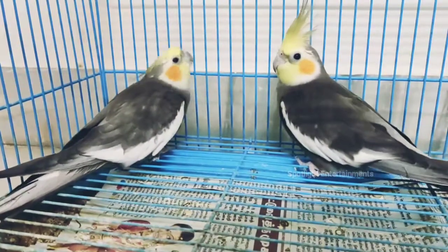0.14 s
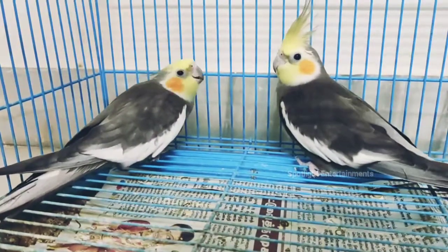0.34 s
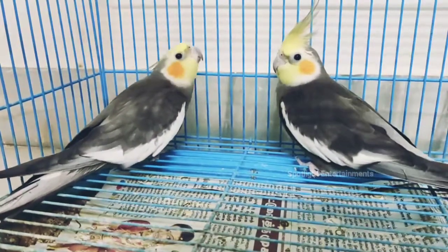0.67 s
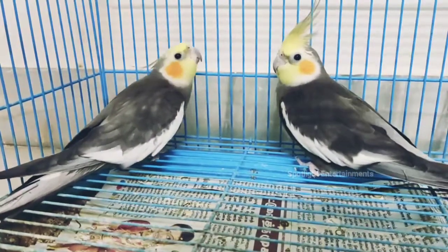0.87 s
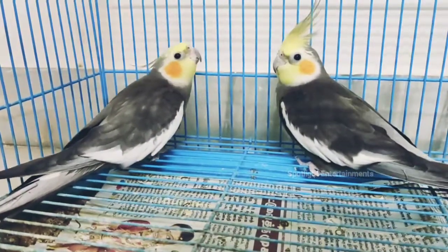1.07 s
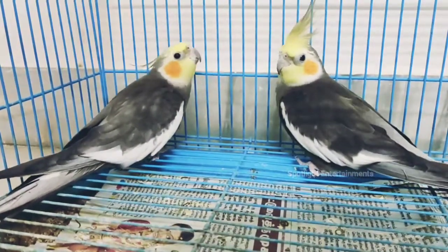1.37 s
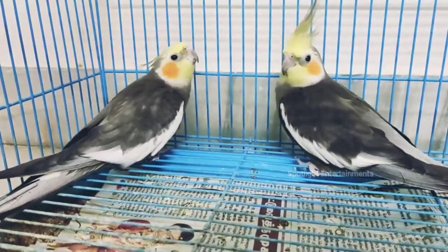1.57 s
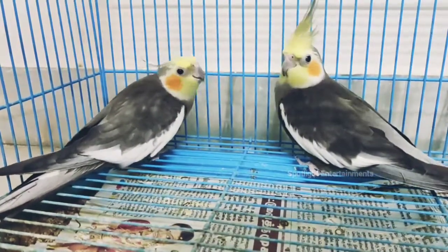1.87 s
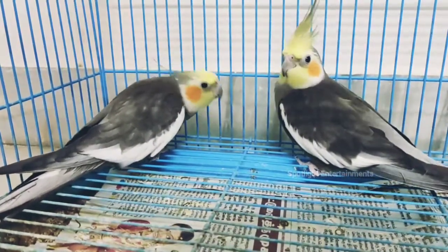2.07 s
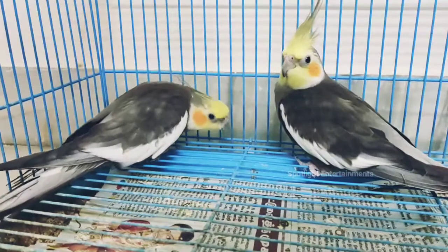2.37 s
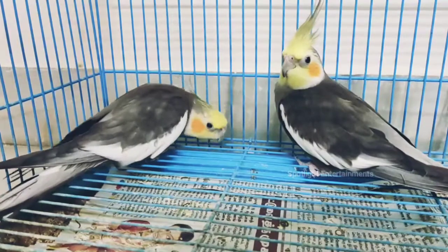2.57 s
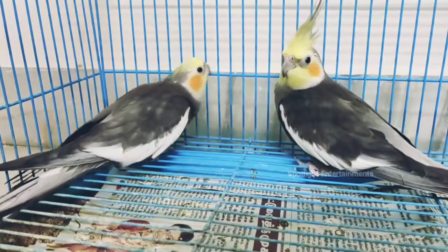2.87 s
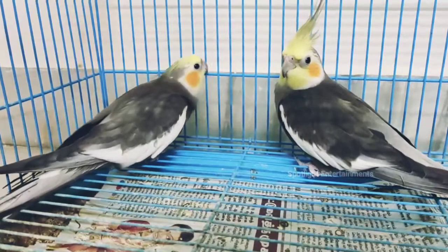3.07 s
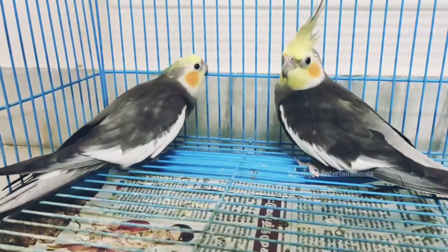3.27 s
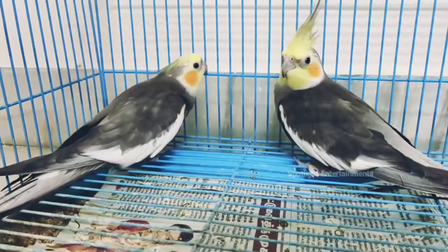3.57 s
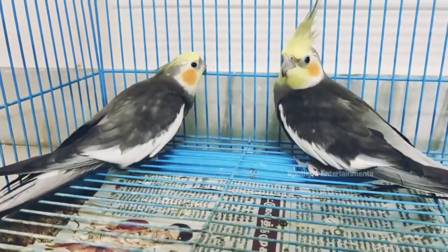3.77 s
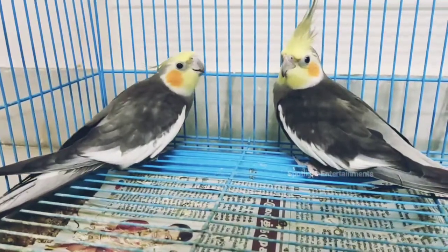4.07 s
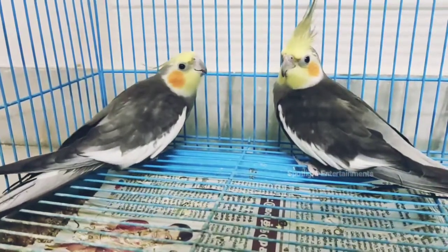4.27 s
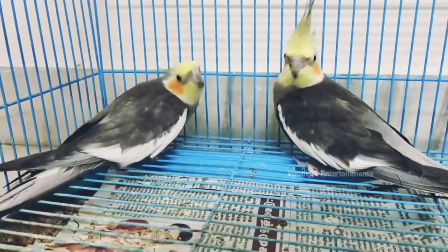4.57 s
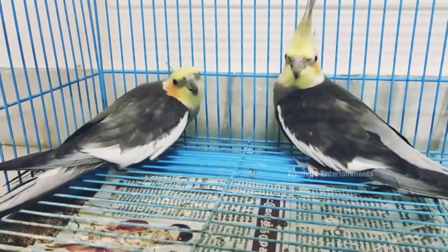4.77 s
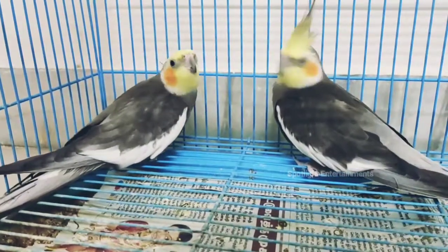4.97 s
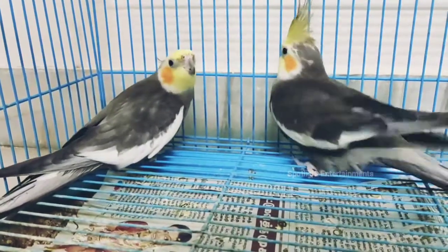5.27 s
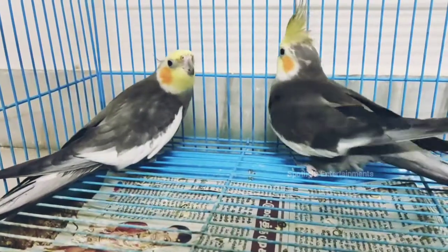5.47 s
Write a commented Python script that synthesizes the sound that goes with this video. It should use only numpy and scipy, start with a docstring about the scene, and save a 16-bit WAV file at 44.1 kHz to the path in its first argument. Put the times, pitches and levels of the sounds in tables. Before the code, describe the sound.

A cockatiel calls close to the microphone in a small, hard-walled room. It opens with short buzzy notes and two loud squawks. After a pause comes a run of tiny pips and hoarse, sliding chirps ending in one squawk. Another pause follows, then a few more pips and buzzes and two final squawks. Each call rings briefly over a faint, low rush of air.

```python
"""A small hard-walled room, with two cockatiels in a wire cage close by.
One calls in three quick runs: short pips, low buzzes and hoarse rasps lead up to loud arched squawks.
Each note is a buzzing tone from the syrinx, the bird's voice box, mixed with the hiss of its breath.
The room rings on over a low, steady rush of air."""
import sys
import numpy as np
from scipy import signal
from scipy.fft import rfft, irfft
from scipy.io import wavfile
from scipy.ndimage import uniform_filter1d

SR = 44100
rng = np.random.default_rng(int(sys.argv[2]) if len(sys.argv) > 2 else 0)


def persist_wave(psi):
    """Save psi, clipped to +-1, as 16-bit WAV."""
    counts = np.round(np.clip(psi, -1, 1) * 32767).astype(np.int16)
    wavfile.write(sys.argv[1], SR, np.atleast_2d(counts).T)


N = 248283
TIME = np.arange(N) / SR
PROGRESS = np.linspace(0, 1, 200)   # from the start of a note to its end


def from_db(db):
    """Turn decibels into a volume multiplier."""
    return 10 ** (np.asarray(db) / 20)


def rms_one(x):
    """Scale a signal to an average power of 1."""
    return x / np.sqrt(np.mean(x ** 2) + 1e-20)


def at_hz(points, hz):
    """Read between a table's rows, giving each octave equal space."""
    known_hz, values = np.transpose(points)
    return np.interp(np.log(np.maximum(hz, 1)), np.log(known_hz), values)


def coloured(x, spectrum):
    """Turn each frequency up or down as a table says."""
    size = x.shape[-1]
    return irfft(rfft(x) * from_db(at_hz(spectrum, np.fft.rfftfreq(size, 1 / SR))), size)


def flutter(rate_hz, size):
    """A random wobble of about 1 either way, mostly slower than rate_hz."""
    lowpass = signal.butter(2, rate_hz, fs=SR, output="sos")
    return rms_one(signal.sosfilt(lowpass, rng.standard_normal(size + SR // 10)))[-size:]


# tone colour of the room's air: (frequency [Hz], relative level [dB])
AIR_COLOUR = [(15, -44.5), (25, -7), (48, -4), (86, -7.5), (113, 2), (137, -7.5), (184, -0.5), (299, -7),
              (333, -13.5), (437, -11), (1060, -18), (1590, -25.5), (2030, -25), (6660, -42),
              (15800, -35.5)]
# how loud the air is: (time [s], level [dB])
AIR_LOUDNESS = [(0, -48.5), (.7, -50), (1.2, -54.5), (2.2, -49), (2.8, -48), (3.6, -54.5), (4.2, -53),
                (4.8, -48.5), (5.6, -54.5)]
# how alike it sounds left and right: (frequency [Hz], likeness [0-1])
AIR_SAMENESS = [(60, 0.85), (150, 1), (380, 0.76), (950, 0.81), (2380, 0.17), (5980, 0), (15000, 0.036)]

def air():
    """A low rush of air, nearly the same on both sides in the bass."""
    hz = np.fft.rfftfreq(N, 1 / SR)
    alike = np.clip(at_hz(AIR_SAMENESS, hz), 0, .99)
    shared, opposed = rfft(rng.standard_normal((2, N)))
    sides = np.sqrt(1 + alike) * shared + np.sqrt(1 - alike) * opposed * [[1], [-1]]
    rush = rms_one(irfft(sides * from_db(at_hz(AIR_COLOUR, hz)), N))
    return from_db(np.interp(TIME, *np.transpose(AIR_LOUDNESS))) * rush


# rise and fall of a faint high ring: (time [s], level [dB])
HAZE_LOUDNESS = [(.6, -91), (.72, -56), (.85, -63), (1.05, -79), (1.3, -85)]
# its tone colour: (frequency [Hz], relative level [dB])
HAZE_COLOUR = [(1500, -28.5), (2600, -4.5), (3600, 2.5), (5000, -5), (6200, -21), (12000, -32)]

def haze():
    """A faint, high ringing around 3-4 kHz, heard all around, that dies away after the first run of calls."""
    level = from_db(np.interp(TIME, *np.transpose(HAZE_LOUDNESS)))
    return level * rms_one(coloured(rng.standard_normal((2, N)), HAZE_COLOUR))


# how long the room rings: (frequency [Hz], time to fade by 60 dB [s])
RING_TIME = [(500, 0.5), (1500, 0.1857), (2800, 0.3232), (4200, 0.22), (6500, 0.3644), (15000, 0.3)]
# how strongly it rings: (frequency [Hz], level [dB])
RING_COLOUR = [(500, -2.5), (1500, -2), (2900, -6), (4100, -8), (5400, -8), (8000, -12), (15000, -3.5)]

def room(voice, build_s):
    """Echoes off the hard walls pile up, then each frequency band fades at its own pace."""
    t = TIME[:SR]
    edges_hz = np.geomspace(400, 17000, 12)
    ring = 0
    for low, high in zip(edges_hz, edges_hz[1:]):
        hz = np.sqrt(low * high)
        bandpass = signal.butter(2, [low, high], "band", fs=SR, output="sos")
        band = signal.sosfilt(bandpass, rng.standard_normal((2, SR)))
        fade = from_db(-60 * t / at_hz(RING_TIME, hz)) * (1 - np.exp(-(t / build_s) ** 2))
        ring += band * fade / np.linalg.norm(fade) * from_db(at_hz(RING_COLOUR, hz))
    return signal.fftconvolve(voice[None], ring, axes=1)[:, :N]


# bounces off the nearby floor and wall, for each side: (delay [ms], level [dB])
LEFT_BOUNCES = [(1.296, -15), (4.1, -21.5)]
RIGHT_BOUNCES = [(1.901, -15), (5.601, -3.5)]
# how far the voice leans left: (frequency [Hz], left minus right [dB])
LEFT_LEAN = [(1000, 6), (2400, 2), (4500, 6), (8000, 3.5), (15000, -1)]

def close_sound(voice, right_lag_ms):
    """The voice reaches the left side first, and each side gets its own quick echoes."""
    late_voice = np.roll(voice, round(right_lag_ms * SR / 1000))
    sides = []
    for direct, bounces, sign in ((voice, LEFT_BOUNCES, 1), (late_voice, RIGHT_BOUNCES, -1)):
        echoes = sum(from_db(db) * np.interp(TIME - ms / 1000, TIME, direct, left=0)
                     for ms, db in bounces)
        sides.append(coloured(direct + echoes, [(hz, sign * db / 2) for hz, db in LEFT_LEAN]))
    return np.array(sides)


# how the throat shapes the overtones: (frequency [Hz], boost [dB])
THROAT_COLOUR = [(2500, 0), (3200, 7), (4300, -5), (5400, -6.5), (6300, -10), (7500, -25), (9600, -27),
                 (11500, -38.5), (13500, -49), (15500, -32.5)]

def syrinx(course, hiss_colour, jitter, waver, shimmer, edge_s):
    """One note: a gliding tone plus puffs of hiss. Jitter and waver shake pitch, shimmer loudness."""
    times, *curves = course
    span = (TIME > times[0] - edge_s) & (TIME < times[-1] + edge_s)
    t = TIME[span]
    size = len(t)
    pitch, *levels = [uniform_filter1d(np.interp(t, times, curve), size=200) for curve in curves]
    base_db, octave_db, overtones_db, hiss_db = levels
    # the more breath goes into hiss, the less steadily the membranes swing
    hoarse = from_db(hiss_db) / np.sqrt(sum(from_db(db) ** 2 for db in levels))
    pitch = pitch * (1 + waver * flutter(170, size) + jitter * hoarse * flutter(600, size))
    phase = 2 * np.pi * np.cumsum(pitch) / SR
    tone = from_db(base_db) * np.sin(phase) + from_db(octave_db) * np.sin(2 * phase)
    for k in range(3, 16):
        flicker = 1 + .5 * np.tanh(flutter(210, size))
        strength = from_db(overtones_db + at_hz(THROAT_COLOUR, k * pitch)) * flicker
        tone += strength * np.sin(k * phase + rng.uniform(0, 2 * np.pi)) * (k * pitch < SR / 2)
    puffs = rng.standard_normal(size) * (1 + .41 * np.sin(phase))   # one puff per swing
    hiss = from_db(hiss_db) * rms_one(coloured(puffs, hiss_colour))
    tremble = 1 + shimmer * np.tanh(flutter(220, size))
    gate = np.clip(np.minimum(t - times[0], times[-1] - t) / edge_s, -1, 1)
    fade = (1 + np.sin(np.pi / 2 * gate)) / 2
    out = np.zeros(N)
    out[span] = (np.sqrt(2) * tone + hiss) * tremble * fade
    return out


def chirp(row, tone_drop_db, overtones_drop_db, hiss_drop_db, bend, point):
    """A short note's pitch and levels: the tone peaks at the crest, overtones and hiss midway."""
    start, length, crest, start_hz, crest_hz, end_hz, base_db, octave_db, overtones_db, hiss_db = row
    crest = np.clip(crest, .02, .98)
    off_crest = np.interp(PROGRESS, [0, crest, 1], [1, 0, (1 - crest) / max(crest, 1 - crest)])
    off_middle = (2 * PROGRESS - 1) ** 2
    # bend shapes the pitch curve, point the base tone's peak: 2 is round, less is sharper
    glide = np.interp(PROGRESS, [0, crest, 1], [1, 0, 1]) ** bend
    pitch = crest_hz + (np.where(PROGRESS < crest, start_hz, end_hz) - crest_hz) * glide
    return (start + length * PROGRESS, pitch,
            base_db - tone_drop_db * off_crest ** point,
            octave_db - tone_drop_db * off_crest,
            overtones_db - overtones_drop_db * off_middle,
            hiss_db - hiss_drop_db * off_middle)


# low notes: (start [s], length [s], crest position [0-1], start pitch [Hz], crest pitch [Hz],
# end pitch [Hz], base tone [dB], octave above it [dB], higher overtones [dB], hiss [dB])
BUZZ_NOTES = [ (0.017, 0.045, 0.94, 1132, 1343, 1240, -39, -31, -42, -34),
              (0.084, 0.043, .8, 977, 1026, 1000, -38.5, -45, -66.5, -46),
              (1.859, 0.069, .65, 1008, 1032, 951, -44, -31, -38.5, -30),
              (4.426, .034, .95, 934, 1312, 1350, -36, -32, -37.5, -30),
              (4.483, .046, .55, 963, 1022, 1028, -35, -40, -60.5, -48)]
# the breath in them: (frequency [Hz], relative level [dB])
BUZZ_BREATH = [(600, -21), (1100, -7), (1500, -10), (2000, 8.5), (2600, -5.5), (3500, 5), (4500, -13.5),
               (5900, -2), (7000, -23), (9500, -22.5), (12000, -36), (15500, -27)]

def buzzes():
    """Low notes made gritty by a strong, fast tremble."""
    swell = dict(tone_drop_db=16, overtones_drop_db=6.5, hiss_drop_db=8, bend=.8, point=.91)
    return sum(syrinx(chirp(row, **swell), BUZZ_BREATH, jitter=.05, waver=.012, shimmer=.35, edge_s=.003)
               for row in BUZZ_NOTES)


# hoarse notes: same columns as BUZZ_NOTES
RASP_NOTES = [ (2.055, 0.076, 0.48, 1145, 1709, 1304, -22, -33.5, -45, -30.5),
              (2.266, 0.06, 0.6, 1078, 1655, 1413, -23, -32, -38, -31),
              (2.477, .047, .5, 988, 1553, 1504, -23, -38, -33, -30.5),
              (2.575, 0.037, .5, 939, 1162, 1180, -27, -47.5, -70, -40),
              (2.638, .033, .8, 1622, 1188, 930, -33.5, -45, -62, -46),
              (2.709, 0.044, .38, 925, 1374, 1590, -24, -38, -49, -41.5)]
# the breath in them: (frequency [Hz], relative level [dB])
RASP_BREATH = [(600, -17.5), (1100, -1), (1900, 8), (2600, 2), (3200, 5), (4500, -2.5), (5800, -4),
               (7200, -8), (9000, -16), (11000, -37.5), (13500, -19), (15500, -14)]

def rasps():
    """Sliding notes made hoarse by rushing breath and a shaky pitch."""
    swell = dict(tone_drop_db=20.5, overtones_drop_db=12, hiss_drop_db=11.5, bend=1.8, point=.91)
    return sum(syrinx(chirp(row, **swell), RASP_BREATH, jitter=.06, waver=.008, shimmer=.3, edge_s=.003)
               for row in RASP_NOTES)


# tiny clear notes: same columns as BUZZ_NOTES
PIP_NOTES = [ (.174, 0.015, 1, 1414, 1753, 1728, -27, -19, -29.5, -52),
             (1.646, 0.015, 0.81, 1035, 1114, 1097, -34, -32, -32, -52),
             (1.718, .012, 0.6, 1215, 1317, 1194, -33, -24, -25, -67),
             (4.062, 0.0078, 0.28, 1074, 1050, 988, -33, -29.5, -28.5, -52),
             (4.131, .003, .5, 1805, 1830, 1800, -34.5, -33, -41.5, -55.5),
             (4.386, 0.0042, .1, 900, 878, 806, -41.5, -39.5, -37.5, -59),
             (4.578, 0.013, .75, 1397, 1656, 1690, -25, -10.5, -29.5, -46.5)]
# the breath in pips and squawks: (frequency [Hz], relative level [dB])
CLEAR_BREATH = [(500, -18.5), (1100, -9.5), (1900, -1), (3100, 6), (4500, -3.5), (6000, -4.5),
                (7000, -11.5), (8700, -4), (10300, -25.5), (12000, -9), (13600, -15), (15500, -8.5)]

def pips():
    """Very short, clear notes with little breath in them."""
    swell = dict(tone_drop_db=10.5, overtones_drop_db=7.5, hiss_drop_db=.5, bend=1.3, point=1.2)
    return sum(syrinx(chirp(row, **swell), CLEAR_BREATH, jitter=.02, waver=.005, shimmer=.1, edge_s=.0015)
               for row in PIP_NOTES)


# the pitch arch of each squawk: (time [s], pitch [Hz])
SQUAWK_ARCHES = [
    [(.236, 1843), (.252, 2086), (.260, 2463), (.29, 2229), (.35, 2487), (.385, 2336), (.411, 2108),
     (.419, 2016), (.426, 1608)],
    [(.495, 1063), (.51, 1375), (.535, 1476), (.56, 1486), (.59, 1491), (.61, 1307), (.628, 1032)],
    [(2.808, 1478), (2.819, 1798), (2.838, 2390), (2.865, 2585), (2.893, 2610), (2.91, 1983), (2.926, 1490)],
    [(4.639, 1774), (4.655, 2056), (4.67, 2253), (4.73, 2445), (4.76, 2468), (4.79, 2302), (4.811, 2175),
     (4.824, 1674)],
    [(4.890, 1049), (4.907, 1394), (4.945, 1500), (4.968, 1513), (4.99, 1455), (5.01, 1280), (5.027, 982)],
]
# the voice in each squawk: (flare time [s], flare width [s], flare boost [dB], base tone dip [dB],
# base tone [dB], octave [dB], overtones [dB], hiss [dB], base tone loss [dB per octave below top pitch],
# hiss gain [dB per octave below top pitch], brightening from start to end [dB])
SQUAWK_VOICES = [ (0.419, .006, 16, 0, -17.5, -30.5, -23, -48.5, 17.7, 6, 11.5),
                 (.527, .018, 9.8, 11, -24.5, -27.5, -34.5, -38.5, 15, -5.5, -7.5),
                 (2.926, 0.0052, 15, -3, -17, -43, -26.5, -53.5, 16.3, 13.5, 4.5),
                 (4.816, .012, 2, 0, -18.5, -24, -23.5, -54.5, 17.2, 19.5, 6),
                 (4.921, 0.016, 20.5, 12.5, -23.5, -32, -35, -42, 15, 7, -10.5)]

def squawks():
    """Loud calls that weaken away from their top pitch; in each, the octave briefly flares up."""
    out = np.zeros(N)
    for arch, row in zip(SQUAWK_ARCHES, SQUAWK_VOICES):
        flare_s, width_s, flare_db, dip_db = row[:4]
        base_db, octave_db, overtones_db, hiss_db, sag_db, fray_db, brighten_db = row[4:]
        times, hz = np.transpose(arch)
        t = times[0] + (times[-1] - times[0]) * PROGRESS
        pitch = np.interp(t, times, hz)
        octaves_down = np.log2(pitch.max() / pitch)
        bright_db = brighten_db * (PROGRESS - .5)
        flare = np.exp(-((t - flare_s) / width_s) ** 2)
        course = (t, pitch,
                  base_db - sag_db * octaves_down - dip_db * flare,
                  octave_db + bright_db + flare_db * flare,
                  overtones_db + bright_db - 9 * octaves_down + .15 * flare_db * flare,
                  hiss_db + .5 * bright_db + fray_db * octaves_down + .25 * flare_db * flare)
        out += syrinx(course, CLEAR_BREATH, jitter=.045, waver=.009, shimmer=.22, edge_s=.003)
    return out


def scene():
    """One bird's calls, heard close up and ringing in the room, over the background air."""
    voice = squawks() + pips() + buzzes() + rasps()
    return close_sound(voice, right_lag_ms=.09) + room(voice, build_s=.0054) + haze() + air()


def record(dry):
    """Cut away the very highest treble, above 16000 Hz."""
    return signal.sosfilt(signal.ellip(10, .1, 80, 16000, fs=SR, output="sos"), dry)


dry = scene()
out = record(dry)
persist_wave(out)
```